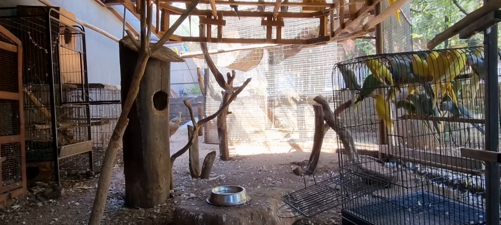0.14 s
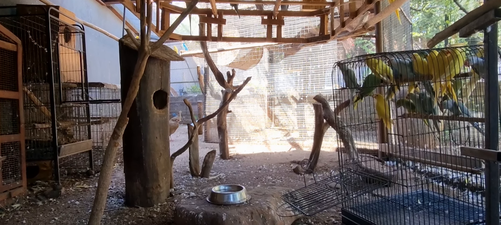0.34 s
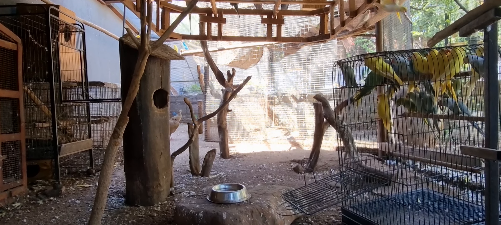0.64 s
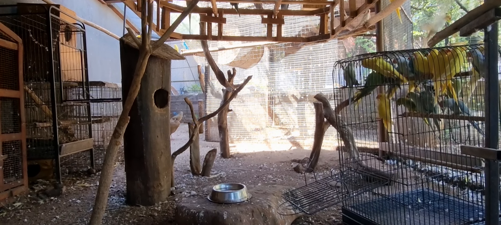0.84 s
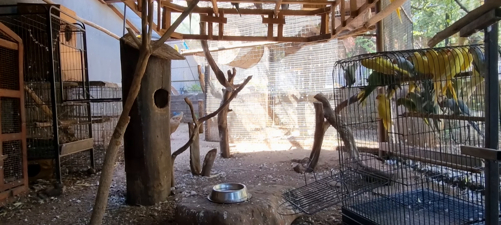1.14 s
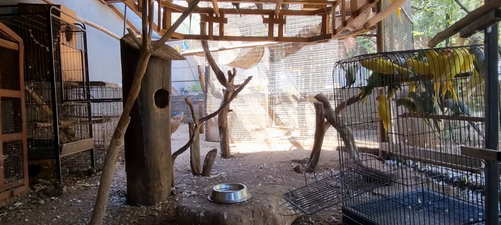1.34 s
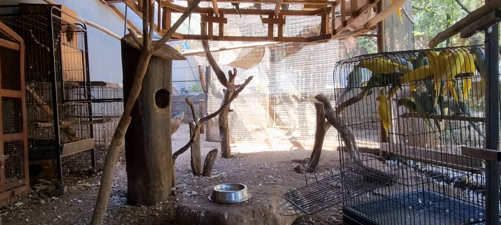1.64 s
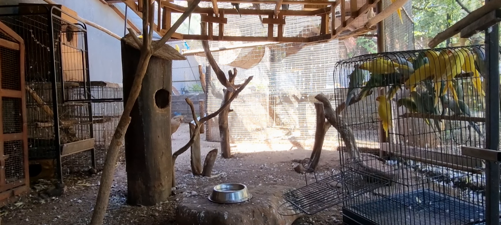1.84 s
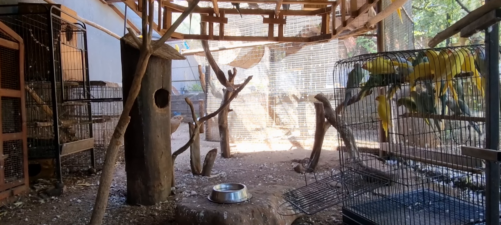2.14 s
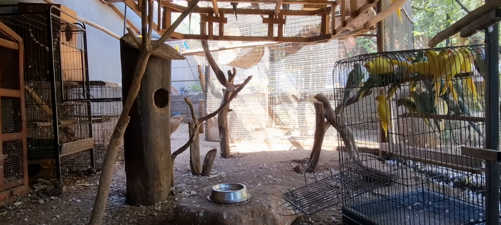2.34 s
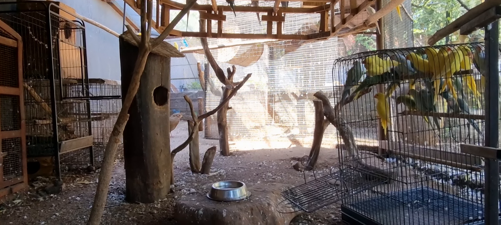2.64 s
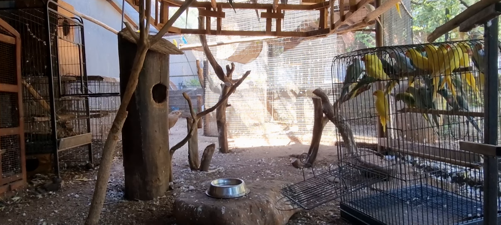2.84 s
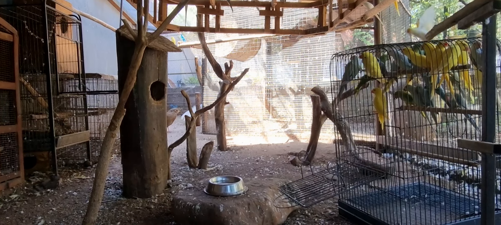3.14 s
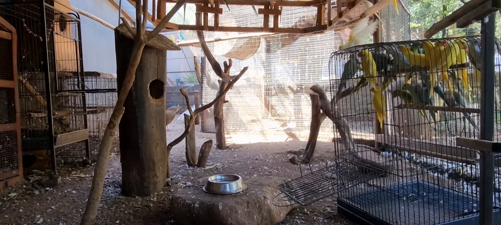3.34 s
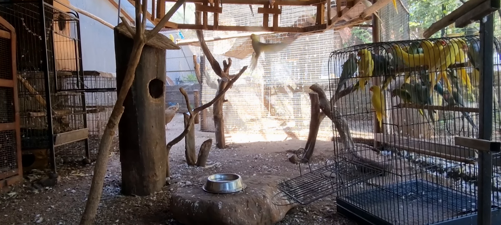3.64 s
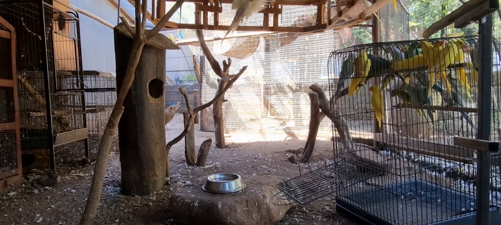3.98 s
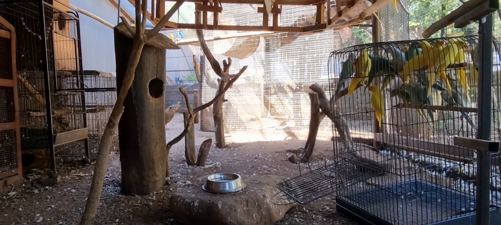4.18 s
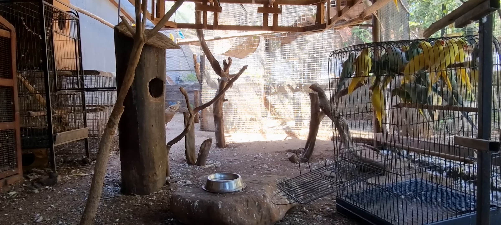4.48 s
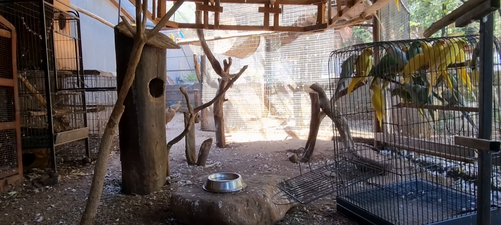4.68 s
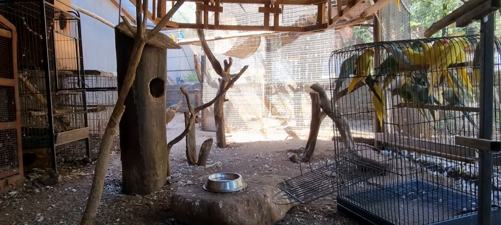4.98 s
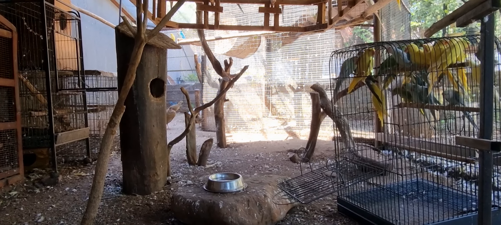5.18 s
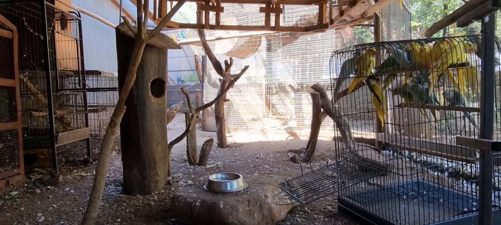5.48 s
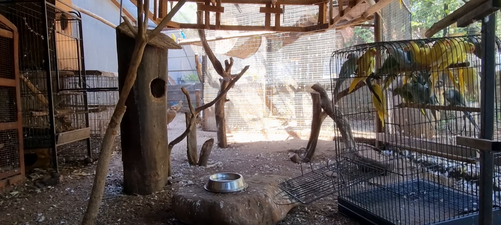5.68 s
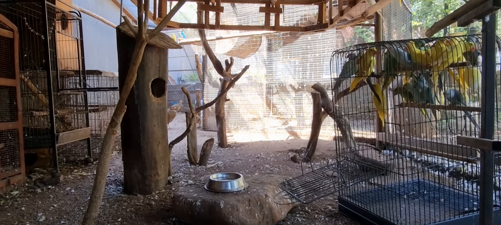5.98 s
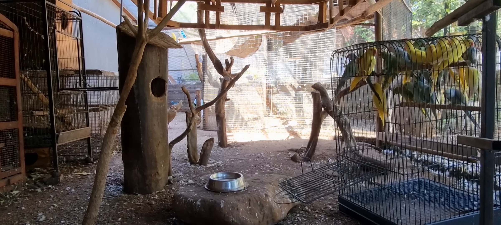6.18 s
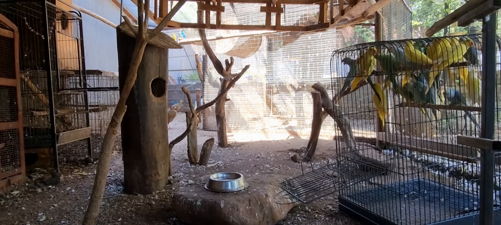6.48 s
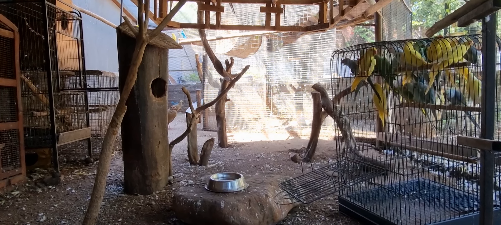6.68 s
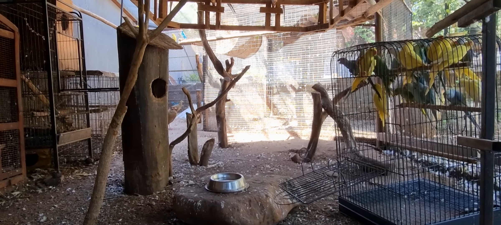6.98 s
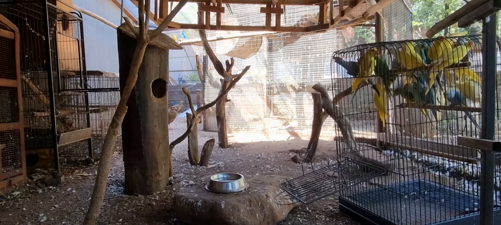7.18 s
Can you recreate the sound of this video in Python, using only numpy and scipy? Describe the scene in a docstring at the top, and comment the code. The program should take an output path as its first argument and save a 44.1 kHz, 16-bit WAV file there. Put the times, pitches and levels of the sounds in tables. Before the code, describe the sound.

High, rasping parakeet cries overlap close by on the right of a wire aviary, over more distant calls and slight wind on the microphone.

```python
"""In a wire aviary, a flock of parakeets screams close to the right-hand microphone.
The syrinx is a nonlinear oscillator: a full scream rasps upward with period doubling, locks into a clear
whistle and breaks into a falling rasp. Arched squawks, a buzzy screech, soft notes, trills, low croaks
and the din of farther birds fill the gaps, all with short reflections from roof and walls.
A faint drone lies behind; on the left, moving air buffets the microphone and there is one dull knock."""
import sys
import numpy as np
from scipy import signal
from scipy.fft import rfft, irfft, next_fast_len
from scipy.io import wavfile
from scipy.ndimage import uniform_filter1d, minimum_filter1d

SR = 44100
rng = np.random.default_rng(int(sys.argv[2]) if len(sys.argv) > 2 else 0)


def master_out(mix):
    """Clip the mix to full scale and print it as 16-bit PCM to the path in sys.argv[1]."""
    frames = np.transpose(np.atleast_2d(mix))
    ceiling = np.clip(frames, -1, 1)
    pcm = np.round(ceiling * 32767).astype(np.int16)
    wavfile.write(sys.argv[1], SR, pcm)


N = 322812

# full screams, timed by their whistle:
# start_s, hold_s, top_hz, droop_hz, whistle_db, second_partial_boost_db, rasp_base_db, roughness (0-1)
SCREAM_CALLS = [ (-.024, 0.085, 3764, 250, -13, 5.5, -13.5, 0.29),
                (0.721, 0.067, 3716, 710, -13, 3.5, -10.5, 0.33),
                (0.874, 0.057, 3850, 131, -14, 2, -10, 0.1), (1.024, 0.069, 3654, 734, -14, 3, -13, 0.05),
                (1.165, 0.076, 3630, 264, -17, 10.5, -9, 0.08),
                (1.466, .058, 3606, 620, -12.5, 3, -10.5, 0.33),
                (1.628, 0.051, 3660, 426, -8.5, -1, -9.5, 0.13),
                (2.051, 0.061, 3480, 533, -15, 4, -11.5, 0.17),
                (2.161, 0.066, 3617, 330, -11, -7, -9, 0.08), (2.342, 0.064, 3357, 273, -14, 8, -13.5, 0.3),
                (2.668, .02, 3196, 153.3, -21.5, 2, -18.5, 0.1),
                (3.569, .055, 3597, 320, -14.5, 1.5, -8, 0.28),
                (3.909, 0.075, 3562, 198, -12, 5.5, -8, 0.11),
                (4.346, 0.068, 3513, 110, -11.5, 3.5, -9, 0.22),
                (5.237, 0.063, 3517, 300, -24.5, 9, -18, 0.32),
                (5.649, 0.057, 3463, 50, -15.5, 1, -11.5, .26),
                (6.033, 0.059, 3430, 317, -15.5, 4.5, -9, 0.48),
                (6.361, 0.07, 3556, 312, -8.5, 5, -10, .39)]
# throat and beak response while rasping: frequency_hz, gain_db
RASP_THROAT = [(500, -16), (1000, -13), (1900, -7.5), (2600, 3.5), (3300, 2), (4400, -2), (5500, -2),
               (7200, -7.5), (9000, -14.5), (11500, -23), (14000, -21), (16000, -39)]
# whistle partials 1-4: level_db
WHISTLE_PARTIALS = [1, -11, -16.5, -14.5]
# squawks: start_s, length_s, top_hz, depth (share of top), level_db, subharmonic_db, roughness (0-1),
# peak (share of the length before the top)
SQUAWK_CALLS = [ (0.031, 0.12, 3890, 0.27, -13, 5.5, .7, 0.44),
                (0.127, 0.096, 3955, 0.27, -11.5, -1.5, 0.52, 0.4),
                (0.302, 0.08, 4580, 0.035, -23, 13.5, 0.21, 0.69),
                (0.366, .13, 4850, 0.43, -12, 0, 0.4, 0.34), (1.725, 0.28, 3610, .06, -17.5, -3, 0.86, .12),
                (1.802, 0.079, 4653, 0.4, -9.5, 0, 0.7, 0.14),
                (2.282, 0.13, 4324, .28, -12, -3, 0.59, 0.42),
                (2.583, 0.029, 3410, .1, -20.5, 3, 0.84, 0.43),
                (2.918, 0.13, 3374, 0.38, -15.5, -1.5, 0.37, 0.44),
                (3.005, 0.17, 5420, 0.49, -15.5, 3, 0.28, .39),
                (3.256, 0.18, 5286, 0.46, -12.5, 3.5, 0.71, 0.37),
                (3.46, 0.28, 4315, 0.24, -22, 8, 0.31, 0.52), (4.063, 0.16, 4190, 0.11, -27, 1, 0.25, 0.62),
                (4.619, 0.19, 4320, 0.093, -22.5, 16, 0.68, 0.5),
                (5.457, 0.15, 4826, .43, -14.5, -3.5, 0.25, 0.3),
                (5.761, .11, 4924, 0.34, -14, -1, .44, 0.28), (5.868, 0.14, 4840, 0.13, -27, 2, .29, 0.16),
                (5.985, .13, 4930, 0.29, -15.5, 3.5, .8, 0.46),
                (6.11, 0.17, 4564, 0.33, -25, 10, 0.42, 0.21), (6.283, .075, 4600, 0.21, -5, 2, 0.88, 0.33),
                (6.353, 0.1, 5210, 0.3, -4.5, -1, 0.88, 0.28), (6.493, .13, 3750, .31, -19.5, 1, .3, 0.33),
                (6.561, 0.14, 4315, 0.073, -25, 2, 0.4, 0.21),
                (6.686, 0.26, 4290, 0.11, -30.5, 10.5, 0.29, .25),
                (6.89, 0.076, 3466, .16, -31, -2, 0.3, .4), (7.025, .185, 3825, .42, -23, 2, 0.25, 0.052),
                (7.252, 0.093, 4530, 0.42, -16.5, 1, 0.56, 0.55)]
# clear notes: start_s, length_s, start_hz, end_hz, level_db, overtone_db
CLEAR_NOTES = [(2.389, 0.13, 1426, 1370, -38, -30), (2.492, 0.16, 1383, 1400, -29, -37),
               (4.122, 0.042, 2143, 2058, -15.5, -10.5), (4.192, 0.091, 1368, 1254, -22, -25),
               (4.754, 0.045, 1534, 1414, -25, -22), (5.07, 0.053, 373, 363, -43, 8.5),
               (5.159, 0.094, 494, 533, -43, 8.5), (5.236, 0.13, 505, 520, -45, 11.5),
               (5.348, 0.094, 657, 970, -41.5, -5)]
# chattering trills: start_s, length_s, pulse_rate_hz, level_db
TRILL_CALLS = [(2.763, 0.13, 52, -21), (6.676, 0.14, 48, -26), (6.938, 0.07, 23, -34)]
# harsh croaks: start_s, length_s, nominal_pitch_hz, level_db
CROAK_CALLS = [(.477, 0.28, 720, -37), (2.002, 0.5, 740, -42), (3.146, 0.28, 755, -22),
               (3.422, 0.33, 734, -20), (3.745, 0.35, 687, -31), (3.969, 0.42, 702.6, -24.5),
               (4.442, 0.13, 724, -32), (4.576, .43, 710, -22.5), (5.758, 0.12, 545, -28),
               (6.494, .39, 667, -30.5)]
# response of the wide-open throat: frequency_hz, gain_db
OPEN_THROAT = [(290, -49), (500, -38), (962, 1.5), (1260, -1.5), (1720, -2), (1850, 1.5), (2070, 1.5),
               (2360, 3.5), (3560, -33), (4410, -13), (5380, -5.5), (7910, -45), (10700, -40),
               (12500, -17.5), (15000, -57)]
# bouts of calling from farther birds: start_s, length_s, level_db
DIN_BOUTS = [(-.1, .38, -22), (.42, 1.046, -23.5), (1.48, 1.05, -25.5), (1.68, 0.38, -20.5),
             (2.68, 1.06, -24), (4.08, 0.45, -26), (4.5, 0.66, -23), (4.92, 0.484, -17.5),
             (5.54, 0.44, -22.5), (6.32, .36, -20.5)]
# colour of farther birds in the enclosure: frequency_hz, gain_db
DIN_SPECTRUM = [(180, -50), (300, -15.5), (391, -9.5), (696, -10), (849, -31.5), (1240, 1), (1440, -9),
                (2040, -15.5), (3340, 1.5), (4490, -8.5), (5130, -14), (5950, -7.5), (8990, -18),
                (15500, -39.5)]
# thumps of air on the left microphone: centre_s, frequency_hz, half_width_s, level_db
AIR_BUFFETS = [(2.691, 47.2, 0.022, -28), (2.747, 32, 0.027, -27), (2.951, 38, 0.018, -20),
               (3.248, 64, 0.0063, -7.5), (3.493, 47.3, 0.044, -22)]
# rumble of moving air: frequency_hz, gain_db
RUMBLE_SPECTRUM = [(12, -27), (20, 6.5), (38, 4.5), (66, -2.5), (83, -2), (151, -28.5), (211, -33.5),
                   (250, -31.5), (320, -58), (550, -120)]
# spells of a far-off drone: start_s, length_s, level_db
DRONE_SPELLS = [(.65, .55, -48.5), (1.62, .33, -44), (2.97, 1.7, -45), (6.5, .95, -51.5)]
# left microphone against the right: frequency_hz, gain_db
LEFT_GAIN = [(100, -35), (350, -4.5), (700, -7.5), (1400, -10.5), (2800, -15.5), (5600, -21),
             (10000, -27.5), (15000, -32)]
# phase by which the left leads: frequency_hz, lead_rad
LEFT_LEAD = [(100, 3.9), (350, 2.23), (700, 2.26), (1400, 1.93), (2800, 1.86), (5600, 1.13), (15000, 6.8)]
# spectra of the knock, drone, outdoor air and reverberant tail: frequency_hz, gain_db
KNOCK_SPECTRUM = [(60, 9), (300, -18), (600, -16), (2000, -45)]
DRONE_SPECTRUM = [(60, -16), (140, -16.5), (220, -19.5), (255, -7), (290, -1.5), (325, -7.5), (400, -20),
                  (550, -11.5), (1000, -30.5)]
AIR_SPECTRUM = [(20, -45), (70, 8), (180, -5), (400, 2.5), (900, 16), (3000, -44), (15000, -59)]
TAIL_SPECTRUM = [(200, -6.5), (3000, 15), (7000, 8), (15000, -50)]

CUTOFF_HZ = 15900


def screams(rise_s=.029, fall_s=.062, overlap_s=.006, scoop_hz=209):
    """Regime changes of the syrinx: a rising rasp, a whistle, then a jump up and a fall that breaks up."""
    out = np.zeros(N)
    for start, hold_s, top_hz, droop_hz, whistle_db, boost_db, rasp_db, rough in SCREAM_CALLS:
        u = span(rise_s + overlap_s)
        rise = rasp(arch(u, 2703, 4000, 4920), .44 + rough, subharmonic_db=2.8, tilt_db_per_octave=1)
        add(out, start - rise_s, undb(rasp_db - 4) * fade(len(u), .01, .0069) * rise)

        u = span(hold_s + overlap_s)
        hz = top_hz - scoop_hz * (1 - u) ** 4 - droop_hz * u ** 5.03
        held = whistle(hz, boost_db, rough)
        add(out, start - overlap_s / 2, undb(whistle_db) * fade(len(u), .0071, .0013) * held)

        u = span(fall_s + overlap_s)
        hz = arch(u, 4950, 3900, 2741) * (1 + .02 * rng.standard_normal())
        fall = rasp(hz, .15 + .92 * rough, subharmonic_db=-7 + 10 * u, tilt_db_per_octave=3)
        envelope = undb(rasp_db + 4 * (1.5 - u)) * fade(len(u), .032, .048)
        add(out, start + hold_s - overlap_s / 2, envelope * fall)
    return out


def rasp(hz, rough, subharmonic_db, tilt_db_per_octave=0, jitter=.0699, hiss_db=-16.5):
    """Period doubling: uneven cycles of the syrinx put lines at halves and quarters of the pitch."""
    size = len(hz)
    quaver = .01615 * wobble(size, 169.1)
    phase = phase_of(hz * (1 + quaver + jitter * rough * wobble(size, 1100)))
    voice = np.zeros(size)
    for k, offset in enumerate(rng.uniform(0, 2 * np.pi, 24), 1):
        multiple = k / 4
        octaves = np.log2(multiple)
        db = tilt_db_per_octave * octaves + response(multiple * hz, RASP_THROAT)
        db += 3 * wobble(size, 220.7)  # every line comes and goes
        if k % 4:  # the in-between lines gain on the true harmonics higher up
            db += np.minimum(subharmonic_db + (-15 if k % 2 else -8) + 5 * max(octaves, 0), 1)
        voice += (multiple * hz < CUTOFF_HZ) * undb(db) * np.sin(multiple * phase + offset)
    breath = rough * undb(hiss_db) * noise(size, RASP_THROAT)
    shimmer_db = np.sqrt(rough) * (3 * wobble(size, 900) + .72 * wobble(size, 330))
    return unit((unit(voice) + breath) * undb(shimmer_db))


def whistle(hz, second_boost_db, rough, jitter=.065, flutter_db=3.5):
    """Mode locking: the syrinx holds one clean oscillation, least steady at both ends."""
    size = len(hz)
    unsteady = rough * arch(np.linspace(0, 1, size), 3.34, .47, 3.5)
    phase = phase_of(hz * (1 + jitter * unsteady * wobble(size, 1137)))
    voice = np.zeros(size)
    for k, db in enumerate(WHISTLE_PARTIALS, 1):
        partial_db = db + second_boost_db * (k == 2) + flutter_db * wobble(size, 84.3)
        voice += undb(partial_db) * np.sin(k * phase)
    return np.sqrt(2) * voice


def squawks():
    """Frequency modulation: rough cries arch in pitch; fainter birds, farther off, sound duller."""
    out = np.zeros(N)
    for start, length, top_hz, depth, db, subharmonic_db, rough, peak in SQUAWK_CALLS:
        u = span(length)
        before_top = np.interp(u, [0, peak], [1, 0])
        after_top = np.interp(u, [peak, 1], [0, 1])
        sag = depth * (before_top ** 2.3 + after_top ** (2.5 * np.sqrt(peak)))
        cry = rasp(top_hz * (1 - sag), rough, subharmonic_db, tilt_db_per_octave=.57 * (db + 16))
        swell_db = 24 * (peak - .33) * (u - .5)  # an early top fades, a late one swells
        top_dip_db = 5 * (sag - sag.mean())
        add(out, start, undb(db + swell_db + top_dip_db) * fade(len(u), .022, .027) * cry)
    return out


def screech(start_s=4.95, length_s=.33, level_db=-15, nominal_hz=390, half_width_hz=650, jitter=.0114):
    """Source and filter: a throat resonance arches up and sinks across close, buzzy harmonics."""
    u = span(length_s)
    hz = nominal_hz * arch(u, .93, .92, .9) * (1 + jitter * wobble(len(u), 600))
    phase = phase_of(hz)
    formant_hz = arch(u ** .83, 2300, 4000, 2800)
    voice = np.zeros(len(u))
    for k in range(3, 36):
        moving_formant = 1 / (1 + ((k * hz - formant_hz) / half_width_hz) ** 2)
        upper_formant = undb(-8) / (1 + ((k * hz - 6500) / 1300) ** 2)
        gain = (moving_formant + upper_formant + undb(-32)) * undb(3.2 * wobble(len(u), 116))
        voice += gain * np.sin(k * phase + rng.uniform(0, 2 * np.pi))
    out = np.zeros(N)
    add(out, start_s, undb(level_db) * fade(len(u), .13, .15) * unit(voice))
    return out


def clear_notes():
    """Nearly periodic vibration: a soft gliding fundamental and its octave."""
    out = np.zeros(N)
    for start, length, start_hz, end_hz, db, overtone_db in CLEAR_NOTES:
        u = span(length)
        glide_hz = start_hz + (end_hz - start_hz) * u
        phase = phase_of(glide_hz * (1 + .0073 * wobble(len(u), 61)))
        tone = np.sqrt(2) * (np.sin(phase) + undb(overtone_db) * np.sin(2 * phase))
        add(out, start, undb(db) * fade(len(u), length / 3, length / 3) * tone)
    return out


def trills():
    """Sawtooth modulation: each pulse of a chattering rasp climbs in pitch as it decays."""
    out = np.zeros(N)
    for start, length, pulse_hz, db in TRILL_CALLS:
        u = span(length)
        cycle = (u * length * pulse_hz) % 1
        chatter = np.exp(-cycle / 1.4) * rasp(2700 + 700 * cycle, rough=.92, subharmonic_db=1.6)
        add(out, start, undb(db) * fade(len(u), .03, .048) * unit(chatter))
    return out


def croaks(rattle_hz=88, rough=.683, jitter=.0686, swell_db=8.5):
    """Amplitude modulation: an uneven rattle chops a low voice and turbulence in a wide-open throat."""
    out = np.zeros(N)
    for start, length, nominal_hz, db in CROAK_CALLS:
        u = span(length)
        size = len(u)
        cycle = np.cumsum(rattle_hz * (1 + .2 * wobble(size, 130))) / SR % 1
        waver = 1 + .01863 * wobble(size, 44.8) + jitter * rough * wobble(size, 500)
        phase = phase_of(nominal_hz * arch(u, .87, .96, .87) * waver)
        voice = np.zeros(size)
        for k in range(1, 20):
            voice += undb(5.3 * wobble(size, 63.6)) * np.sin(k * phase + rng.uniform(0, 2 * np.pi))
        turbulence = rough * undb(-3) * rng.standard_normal(size)
        puffs = np.exp(-cycle) * (unit(voice) + turbulence)
        envelope = undb(db + swell_db * (u - .5)) * fade(size, .035, .12)
        add(out, start, envelope * colour(puffs, OPEN_THROAT))
    return out


def din(count=44):
    """Superposition: the squawks of farther birds overlap and swell in bouts."""
    out = np.zeros(N)
    spacing_s = N / SR / (count - 2)
    for k, (delay, length, pitch) in enumerate(rng.uniform(0, 1, (count, 3))):
        u = span(.28 + .12 * length)
        cry = rasp(arch(u, 3200, 4200, 3000) * (.8 + .35 * pitch), rough=.509, subharmonic_db=7.6)
        add(out, (k + delay / 2 - 2) * spacing_s, fade(len(u), .0051, .16) * cry)
    # distance trades the throat's brightness for the duller colour of the enclosure
    distant = [(hz, db - response(hz, RASP_THROAT)) for hz, db in DIN_SPECTRUM]
    return colour(out, distant) * spells(DIN_BOUTS, rest_db=-37.5, attack_s=.095, release_s=.16)


def aviary(x, t60_s=.15, tail_db=-15, early_db=-13, count=8):
    """Reverberation: a few early reflections off roof and walls, and a short diffuse tail."""
    t = np.arange(SR // 2) / SR
    tail = noise(len(t), TAIL_SPECTRUM) * undb(-60 * t / t60_s) * (t > .006)
    echo = undb(tail_db) * tail / np.sqrt(np.sum(tail ** 2))
    delays = rng.integers(SR // 400, SR // 45, count)
    echo[delays] += undb(early_db) / np.sqrt(count) * rng.choice([-1, 1], count)
    return x + signal.fftconvolve(x, echo)[:N]


def buffeting(draught_db=-48.5, stir_db=-25, stir_s=.036, rumble_gain_db=6, hum_hz=60, hum_db=-46):
    """Pressure fluctuation: moving air rumbles, harder around a few soft thumps, over a steady hum."""
    t = np.arange(N) / SR
    flow = np.full(N, undb(draught_db))
    thumps = np.zeros(N)
    for centre_s, hz, half_width_s, db in AIR_BUFFETS:
        lag = t - centre_s
        flow += undb(db + stir_db) * np.exp(-np.abs(lag) / stir_s)
        thumps -= undb(db) * np.sin(2 * np.pi * hz * lag) / (1 + (lag / half_width_s) ** 2) ** 2
    rumble = undb(rumble_gain_db) * flow * noise(N, RUMBLE_SPECTRUM + [(600, -70), (3000, -110)])
    return rumble + thumps + undb(hum_db) * np.sin(2 * np.pi * hum_hz * t)


def knock(start_s=3.484, level_db=-25, decay_s=.0084):
    """A damped transient: one dull little knock of low noise that decays exponentially."""
    out = np.zeros(N)
    t = np.arange(SR // 20) / SR
    add(out, start_s, undb(level_db) * np.exp(-t / decay_s) * noise(len(t), KNOCK_SPECTRUM))
    return out


def background(air_db=-56):
    """Band-limited noise: faint outdoor air and spells of a far-off drone near 300 Hz."""
    air = undb(air_db) * noise(N, AIR_SPECTRUM)
    drone = noise(N, DRONE_SPECTRUM) * spells(DRONE_SPELLS, rest_db=-67, attack_s=.11, release_s=.067)
    return air + drone


def spells(rows, rest_db, attack_s, release_s):
    """Powers add: the gain of a resting level plus a swell for each start_s, length_s, level_db row."""
    power = np.full(N, undb(rest_db) ** 2)
    for start, length, db in rows:
        add(power, start, (undb(db) * fade(len(span(length)), attack_s, release_s)) ** 2)
    return np.sqrt(power)


def undb(db):
    """Decibels to amplitude ratio."""
    return 10 ** (np.asarray(db) / 20)


def unit(x):
    """Normalisation to rms 1."""
    return x / np.sqrt(np.mean(x ** 2) + 1e-18)


def phase_of(hz):
    """Phase in radians, the integral of frequency."""
    return 2 * np.pi * np.cumsum(hz) / SR


def response(hz, rows):
    """Interpolation of frequency_hz, value rows on a log-frequency axis."""
    frequency_hz, value = np.transpose(rows)
    return np.interp(np.log(np.maximum(hz, 1)), np.log(frequency_hz), value)


def colour(x, rows):
    """Zero-phase filtering by frequency_hz, gain_db rows; rms 1."""
    size = next_fast_len(len(x))
    gain = undb(response(np.arange(size // 2 + 1) * SR / size, rows))
    return unit(irfft(rfft(x, size) * gain, size)[:len(x)])


def noise(size, spectrum):
    """Spectrally shaped Gaussian noise; rms 1."""
    return colour(rng.standard_normal(size), spectrum)


def wobble(size, rate_hz):
    """Random modulation through up to 1024 values, rate_hz of them a second; spread near 1."""
    points = rng.standard_normal(1024)
    return 1.2 * np.interp(np.arange(size) * rate_hz / SR, np.arange(len(points)), points)


def fade(size, attack_s, release_s):
    """An envelope with quarter-sine ends."""
    t = np.arange(size) / SR
    attack = np.sin(np.pi / 2 * np.clip(t / attack_s, 0, 1))
    release = np.sin(np.pi / 2 * np.clip((t[-1] - t) / release_s, 0, 1))
    return attack * release


def span(length_s):
    """Normalised time, 0-1 through a sound."""
    return np.linspace(0, 1, max(int(length_s * SR), 64))


def arch(u, start, middle, end):
    """A parabola through three values."""
    return start * (1 - u) * (1 - 2 * u) + 4 * middle * u * (1 - u) + end * u * (2 * u - 1)


def add(track, start_s, x):
    """Superposition of a sound on a track."""
    i = int(start_s * SR)
    lo, hi = max(i, 0), min(i + len(x), N)
    if hi > lo:
        track[lo:hi] += x[lo - i:hi - i]


def scene(shelter_db=-23):
    """Level and phase cues: the birds are full on the right, faint and dull on the windier left."""
    birds = screams() + squawks() + screech() + clear_notes() + trills() + croaks() + din()
    right = aviary(birds) + background()
    hz = np.arange(N // 2 + 1) * SR / N
    right_to_left = undb(response(hz, LEFT_GAIN)) * np.exp(1j * response(hz, LEFT_LEAD))
    left = irfft(rfft(right) * right_to_left, N)
    return np.array([left + buffeting() + knock(), right + undb(shelter_db) * buffeting()])


def record(dry, ceiling=.83):
    """Peak and band limiting: both channels duck on the highest peaks, then a low-pass cuts the top."""
    window = SR // 300
    gain = np.minimum(1, ceiling / (np.abs(dry).max(axis=0) + 1e-9))
    gain = uniform_filter1d(minimum_filter1d(gain, window), window)
    lowpass = signal.ellip(10, .2, 80, CUTOFF_HZ, fs=SR, output="sos")
    return signal.sosfilt(lowpass, dry * gain)


dry = scene()
out = record(dry)
master_out(out)
```